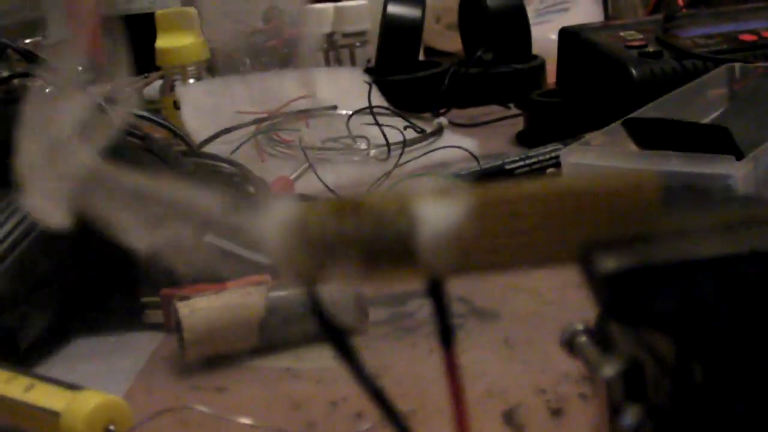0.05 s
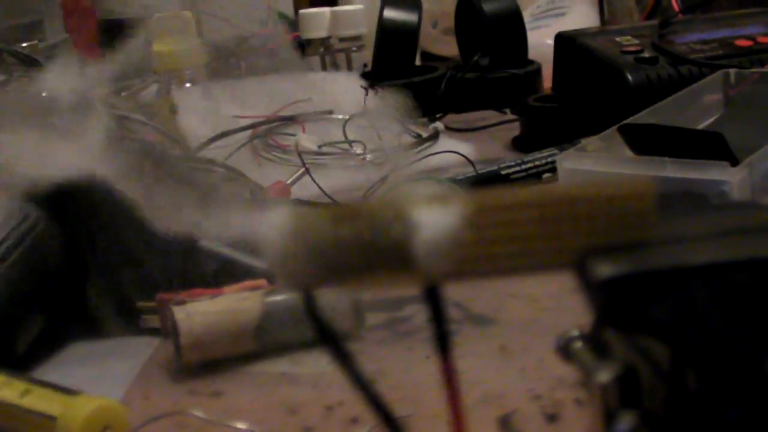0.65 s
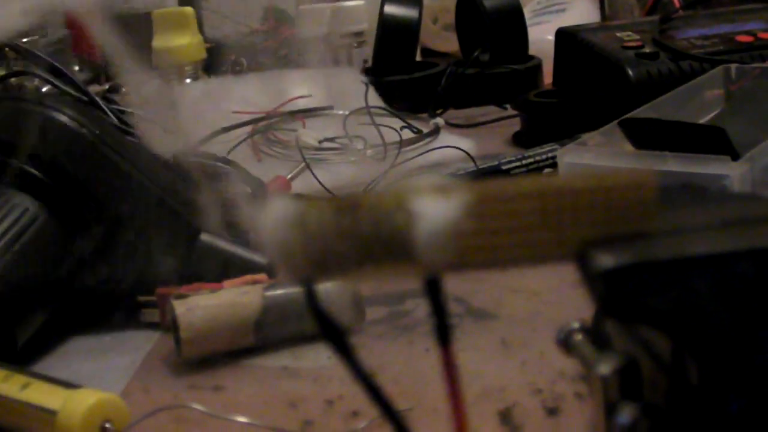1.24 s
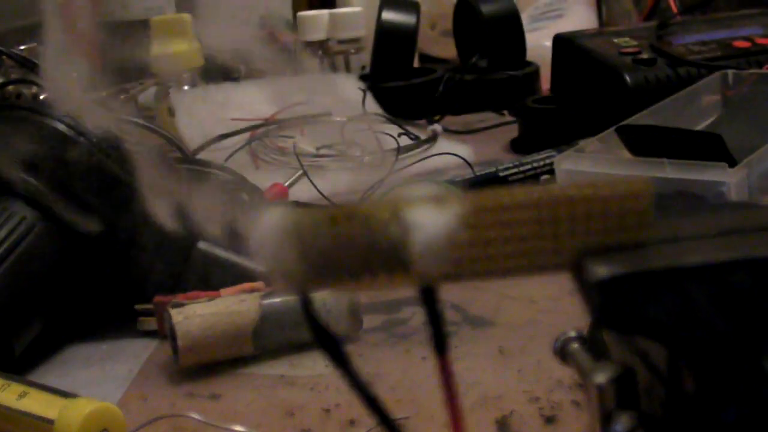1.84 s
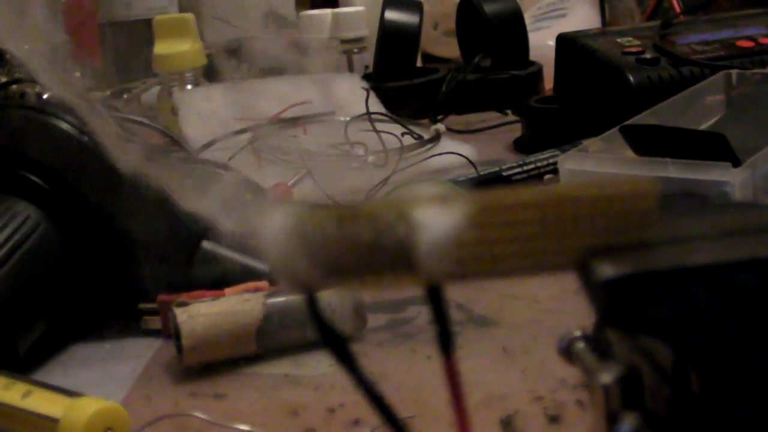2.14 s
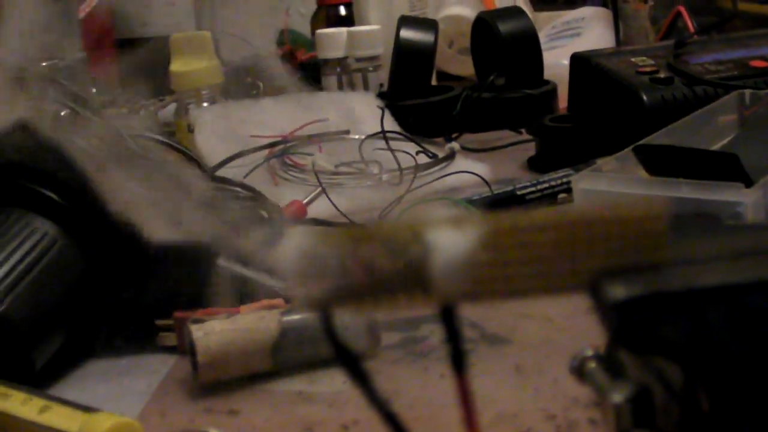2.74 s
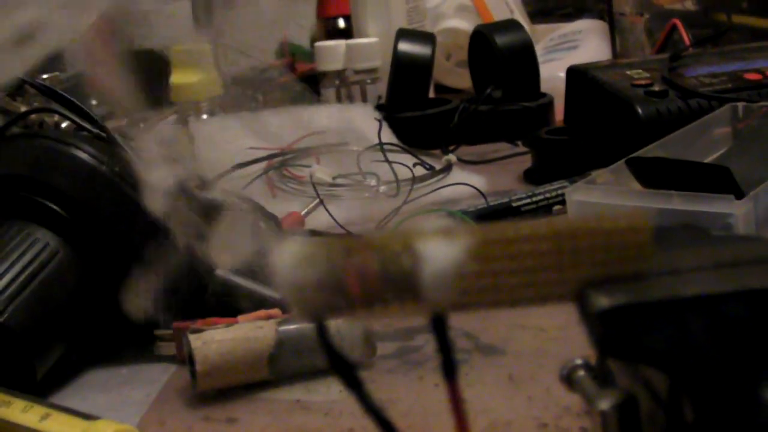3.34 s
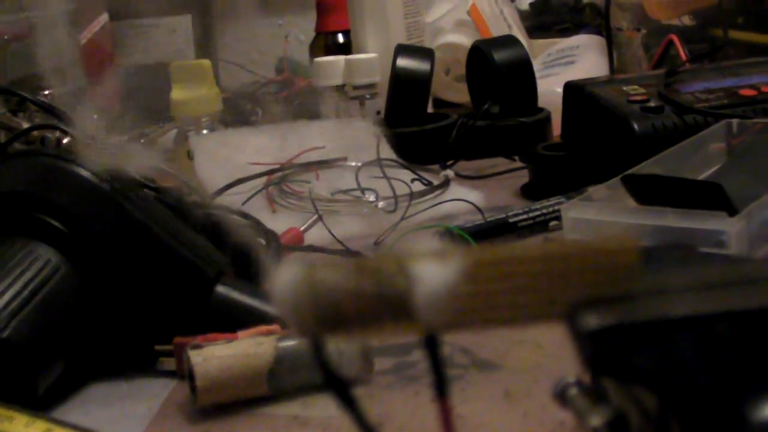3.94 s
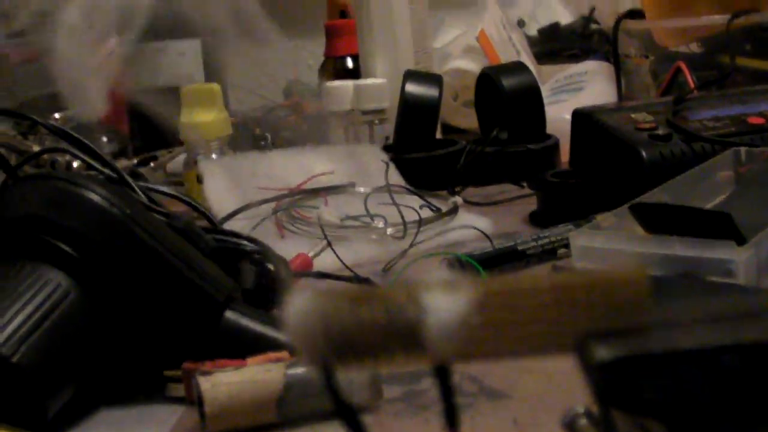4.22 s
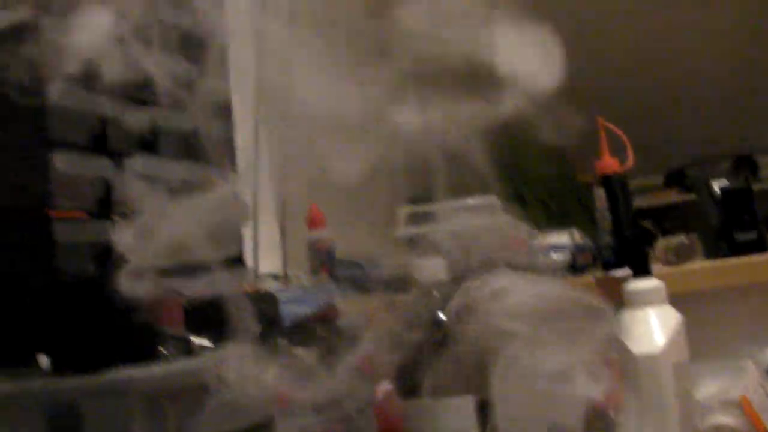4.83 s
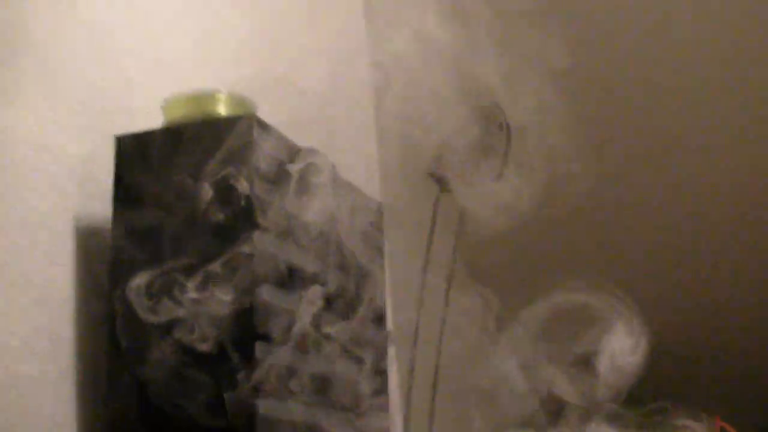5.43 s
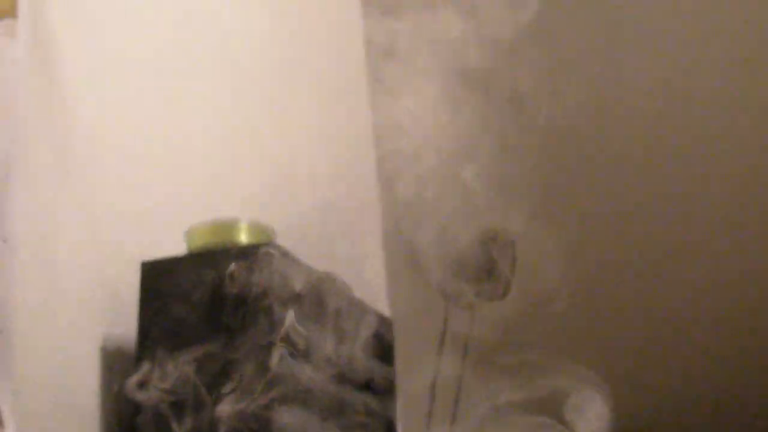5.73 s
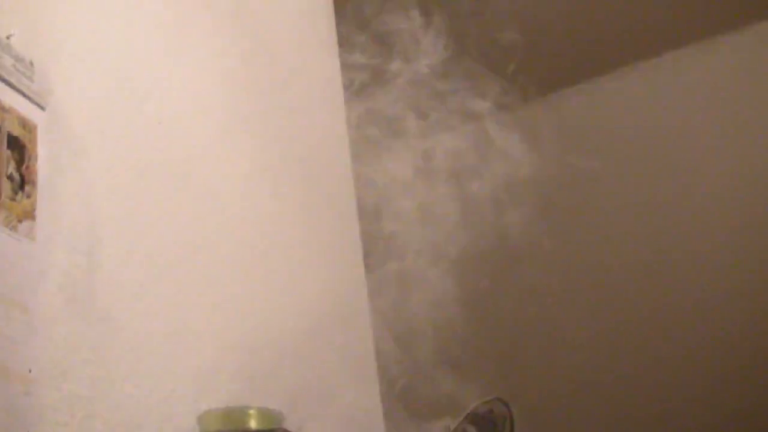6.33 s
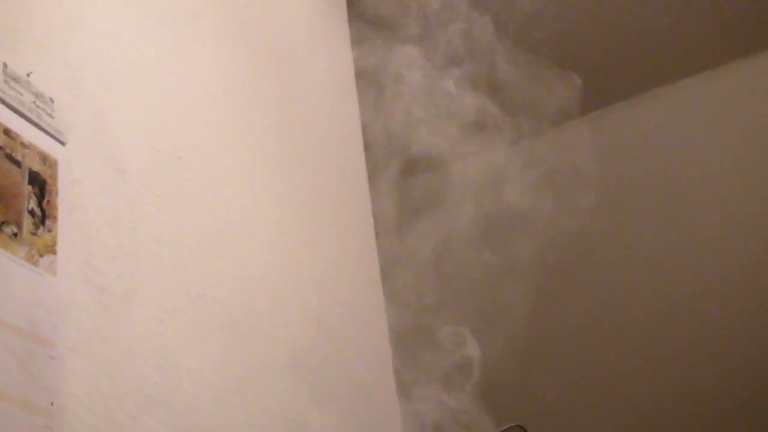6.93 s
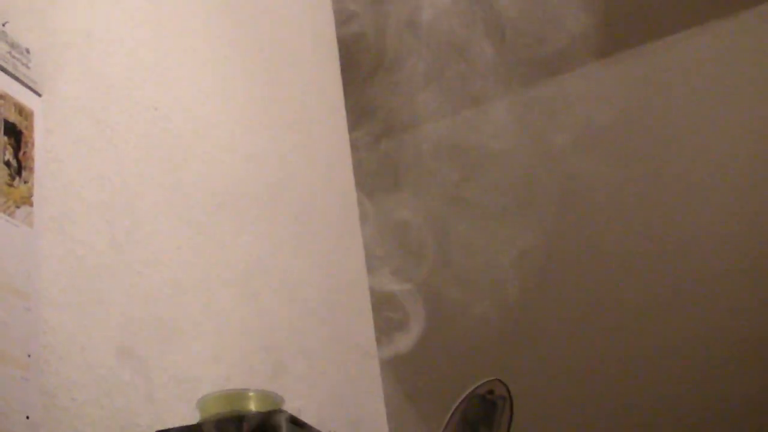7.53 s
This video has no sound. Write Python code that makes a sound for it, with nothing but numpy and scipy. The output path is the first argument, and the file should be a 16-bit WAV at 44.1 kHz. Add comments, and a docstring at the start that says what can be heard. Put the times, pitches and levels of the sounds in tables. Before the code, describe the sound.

A close, high sizzle with sharp little pops fades away after about four seconds, leaving a low hum and fan rush.

```python
"""A workshop bench: a homemade vaporizer boils liquid on its hot coil, close to a camcorder.
Thousands of tiny bursting bubbles sizzle and big ones pop; the boil dies away as the coil cools.
Under it the camcorder's drive buzzes at the field rate, beating slowly with a motor's hum.
A hand bumps the camera, and a fan fills the room."""
import sys
import numpy as np
from scipy import signal
from scipy.fft import rfft, irfft
from scipy.io import wavfile
from scipy.ndimage import uniform_filter1d

SR = 44100
rng = np.random.default_rng(int(sys.argv[2]) if len(sys.argv) > 2 else 0)


def int16_out(signal):
    """Quantize to a 16-bit WAV file."""
    q = np.round(np.clip(np.atleast_2d(signal).T, -1, 1) * 32767)
    wavfile.write(sys.argv[1], SR, q.astype(np.int16))


N = 333837
T = np.arange(N) / SR
BIN_HZ = np.maximum(np.arange(N // 2 + 1) * SR / N, 1)


# Boil strength from power-off, coil cooling: t/s, gain/dB
BOIL_DECAY = [(3.68, 1), (3.79, -3), (3.95, -6.5), (4.11, -8.3), (4.16, -11.6), (4.34, -12.2), (4.7, -17),
              (5.0, -24), (5.6, -25.5), (7.57, -31.5)]
# Slow surges under power: t/s, fizz gain/dB, spit gain/dB
BOIL_SURGES = [(0.0, -0.5, -3.5), (0.2, 1.1, 0.5), (0.42, -2, -2.2), (0.8, 0.4, 0), (1.08, -1.5, -1),
               (1.35, -1.4, -2), (1.5, 0.4, 1.4), (2.1, -0.6, 1.1), (2.55, -1, -0.4), (2.9, -1.3, -1.5),
               (3.35, -1.6, -1), (3.7, -0.3, 0.5)]
# Fine-bubble spectrum: f/Hz, gain/dB
FIZZ_SPECTRUM = [(500, -38), (2000, -19.5), (4000, -3.5), (4750, -4), (5600, -0.5), (7400, 2), (8600, 0.5),
                 (11000, 0), (12200, -2), (13500, 2), (15800, -4.5)]
# Coarse-bubble spectrum: f/Hz, gain/dB
SPIT_SPECTRUM = [(200, -5.5), (500, 0), (900, -1), (1600, -0.5), (2200, 1), (2500, -1), (2900, 0),
                 (3700, -0.5), (5000, -1.5), (9000, -14.5)]

def sizzle(fizz_base_db=-32, spit_base_db=-41):
    """Fine fizz, sparse dry crackles and coarser spitting surge, then fade as the coil cools."""
    times, fizz_db, spit_db = np.transpose(BOIL_SURGES)
    boil_db = np.interp(T, *np.transpose(BOIL_DECAY)) + 0.5 * wander(16)
    crackles = unit_rms(bubbles(per_s=200, spread_db=3.5, echo_db=-12))
    fizz = unit_rms(bubbles(per_s=14000, spread_db=3.5, echo_db=-0.5))
    fizz = unit_rms(colour(fizz + undb(-21) * crackles, FIZZ_SPECTRUM))
    fizz *= undb(fizz_base_db + np.interp(T, times, fizz_db))
    spit = bubbles(per_s=5000, spread_db=3, echo_db=-5.5)
    spit = unit_rms(colour(spit, SPIT_SPECTRUM))
    spit *= undb(spit_base_db + np.interp(T, times, spit_db) + 1.1 * wander(14))
    return (fizz + spit) * undb(boil_db)


def bubbles(per_s, spread_db, echo_db):
    """Tiny bursts at random times, most weak, a few strong, each with its echoes."""
    strength = undb(spread_db * np.minimum(rng.exponential(size=N), 7))
    bursts = (rng.random(N) < per_s / SR) * strength * rng.choice([-1, 1], N)
    return mic_pair(bursts) + undb(echo_db) * scatter(bursts, decay_s=0.015)


# Big bubbles, ending in a sputter: t/s, relative energy/dB, nominal f/Hz, spray re snap/dB
BIG_POPS = [(0.1321, 5.5, 6700, -6), (0.201, -13, 3600, -2), (0.2671, -14, 6500, -7),
            (0.3027, -5.5, 7300, -4.5), (0.384, -7, 5600, 2.5), (0.6337, -4.5, 11000, 1),
            (0.652, -23, 5000, 0), (0.7126, -12, 4200, -5), (0.7614, -2.5, 6400, -1), (0.822, -6, 4400, 1),
            (0.8344, 5, 4500, -15), (0.9019, -15, 4800, -7), (1.003, -13, 6000, -4), (1.255, -11, 7500, -7),
            (1.3008, -1.5, 5000, -13), (1.4041, -0.5, 8800, -5), (1.4701, -17, 7000, -3),
            (1.4822, -9.5, 5000, 7), (1.508, -16, 5000, -3), (1.6088, -12.5, 4000, -7),
            (1.678, -14.5, 3600, -4), (1.7122, -9, 5400, -2), (1.7802, -12, 6600, -5),
            (1.792, -11, 6000, -5), (1.833, -13, 5500, -3), (1.8434, -15, 6500, -6),
            (1.9206, -11, 5500, -4), (2.061, -14, 3400, -1), (2.0836, 3.5, 3200, -17),
            (2.1396, -17, 4000, -6), (2.3152, -11, 5600, 2), (2.441, -8.5, 7700, -3),
            (2.4537, -10.5, 5500, -4), (2.6954, -3.5, 9800, -6), (2.734, -15, 5500, -4),
            (2.7627, -8.5, 6500, 0), (2.9446, -2.5, 5400, -6), (3.0152, -16, 5500, -4),
            (3.0872, -22, 3400, -4), (3.2122, -6, 7600, -2), (3.231, -7, 6400, 0), (3.2907, -14, 7500, -6),
            (3.3903, -10, 6000, -6), (3.5903, -19, 5500, -6), (3.7337, -24, 5000, 19),
            (3.828, -18, 5000, -3), (3.87, -16.5, 6400, -6), (3.9203, -16, 6400, -6),
            (3.9448, -14, 7600, -4), (3.9692, -14, 6400, 0), (4.0051, -14, 6400, -8),
            (4.0256, -19, 6400, -5), (4.0535, -16, 5400, -2), (4.0755, -16, 6800, -5),
            (4.088, -22, 6400, -4), (4.0995, -16, 6400, -9), (4.113, -19, 6400, -3), (4.1318, -17, 6000, 2)]

def pops(edge_db=-9, body_db=-11, room_db=-11, spray_decay_s=0.0078, size=1024):
    """A bursting bubble: one sharp pressure cycle, a spray of droplets, a short, duller room tail."""
    rows = list(BIG_POPS) + small_pops(until_s=BOIL_DECAY[0][0])
    snaps, sprays = np.zeros(N + size), np.zeros((2, N + size))
    t = np.arange(size) / SR
    impulse = -1.0 * (t == 0)
    edge = undb(edge_db) * unit_rms(bandpass(impulse, 11000, 5000))
    body = undb(body_db) * unit_rms(bandpass(impulse, 900, 1900))
    for at_s, db, hz, spray_db in rows:
        snap = unit_rms(bandpass(impulse, 0.88 * hz, 1.23 * hz)) + edge + body
        droplets = bandpass(rng.standard_normal((2, size)), 1.34 * hz, 1.1 * hz)
        spray = unit_rms(droplets * np.exp(-t / spray_decay_s))
        start = int(at_s * SR)
        gain = undb(db + 0.04) / np.sqrt(size)
        snaps[start:start + size] += gain * snap
        sprays[:, start:start + size] += gain * undb(spray_db) * spray
    room = undb(room_db) * bandpass(scatter(snaps[:N], decay_s=0.0052), 1400, 7000)
    return mic_pair(snaps[:N]) + sprays[:, :N] + room


def small_pops(until_s, count=8, db=-11, hz=9000, spray_db=-17, spread_db=4, spread_oct=0.46):
    """Smaller bubbles burst at random under power; rows as in BIG_POPS."""
    times = until_s * (np.arange(count) + rng.random(count)) / count
    return [(at_s, db + spread_db * loud, hz * 2 ** (spread_oct * high), spray_db)
            for at_s, (loud, high) in zip(times, rng.standard_normal((count, 2)))]


# Wet bubbles: t/s, onset level/dB, onset f/Hz, decay/s
RINGING_BUBBLES = [(0.8344, -8, 4870, 0.00041), (3.679, -32, 2920, 0.0022), (3.7, -20.5, 2840, 0.00073),
                   (3.734, -16.5, 3560, 0.00067), (3.7345, -33, 2290, 0.0046)]

def gurgles(glide_per_s=25, size=1024):
    """A bubble in the liquid rings for a few cycles, rising in pitch as it surfaces."""
    rings = np.zeros(N + size)
    t = np.arange(size) / SR
    for at_s, db, hz, decay_s in RINGING_BUBBLES:
        start = int(at_s * SR)
        phase = 2 * np.pi * hz * t * (1 + glide_per_s * t / 2)
        rings[start:start + size] += undb(db) * np.sin(phase) * np.exp(-t / decay_s)
    return mic_pair(rings[:N])


# Holder modes: f/Hz, width/Hz, level re direct/dB
HOLDER_MODES = [(1260, 41, -3.5), (2022, 49, -1.5), (2290, 200, -7.5), (2800, 310, -6.5), (3106, 450, -5.5),
                (3700, 85, -11), (3990, 75, -17), (5250, 200, -13), (6010, 200, -10.5), (6400, 300, -23)]
# Bench-echo notches: f/Hz, width/Hz, share removed/0-1
BENCH_NOTCHES = [(1810, 80, 0), (2500, 66, 0), (3560, 130, 0.1), (4560, 450, 0.14), (7200, 170, 0.25)]

def holder_and_bench(boil):
    """The coil's holder rings faintly; bench echoes partly cancel a few pitches."""
    boil = boil + sum(undb(db) * bandpass(boil, hz, width_hz) for hz, width_hz, db in HOLDER_MODES)
    for hz, width_hz, share in BENCH_NOTCHES:
        boil = boil - share * bandpass(boil, hz, width_hz)
    return boil


# Spectrum of one drive knock: f/Hz, gain/dB
KNOCK_SPECTRUM = [(30, -28), (60, -12.5), (120, -0.5), (180, 0), (240, 0), (300, 0.7), (360, 2.04),
                  (420, -3.5), (540, -13), (700, -30.5), (960, -15.5), (1200, -21.5), (1600, -25),
                  (3000, -46.5)]

def camcorder(field_hz=59.94, line_hz=15734, pulse_hz=11.4, uneven_db=0.97):
    """The drive knocks once a field, rattling the case; the line circuit gives a pulsing whistle."""
    times = np.arange(0.00195, N / SR - 0.001, 1 / field_hz)
    knocks = np.zeros(N)
    knocks[(times * SR).astype(int)] = -undb(uneven_db * rng.standard_normal(len(times)))
    rattle = undb(-15) * scatter(knocks, decay_s=0.0045)
    buzz = undb(-41) * unit_rms(colour(knocks + rattle, KNOCK_SPECTRUM))
    chatter = bandpass(scatter(knocks, decay_s=0.011), 1080, 600)
    chatter = undb(-67) * unit_rms(chatter * undb(5.5 * wander(25)))
    pulsing = 1 + 0.38 * np.sin(2 * np.pi * pulse_hz * T)
    whistle = undb(-66) * unit_rms(pulsing * np.sin(2 * np.pi * line_hz * T))
    whine = undb(-72.5) * unit_rms(bandpass(rng.standard_normal((2, N)), 9625, 70))
    return buzz + chatter + whistle + whine


# Hand on the camera: peak t/s, level/dB, f/Hz, width/Hz, Gaussian sigma/s
HAND_BUMPS = [(4.84, -48.5, 850, 1500, .025), (4.93, -50, 130, 80, .04), (5.908, -41, 92, 40, .025),
              (5.895, -43, 310, 300, .04)]

def handling():
    """Dull bumps and scuffs through the camera body as it tilts up."""
    bumps = np.zeros(N)
    for at_s, db, hz, width_hz, sigma_s in HAND_BUMPS:
        band = bandpass(rng.standard_normal(N), hz, width_hz)
        thud = unit_rms(bandpass(band, hz, width_hz))
        bumps += undb(db) * thud * np.exp(-((T - at_s) / sigma_s) ** 2 / 2)
    return bumps


# Motor hum, louder once the camera is raised: t/s, f/Hz, level/dB
MOTOR_HUM = [(0, 121.15, -67), (0.68, 120.535, -53.5), (3.0, 120.535, -52), (4.4, 120.52, -56),
             (5.3, 120.535, -56), (6.35, 121.08, -56), (6.68, 120.33, -46), (7.57, 120.08, -46)]

def motor():
    """A motor in the room hums just above the drive's second harmonic; the two beat slowly."""
    times, hz, db = np.transpose(MOTOR_HUM)
    phase = 2 * np.pi * np.cumsum(np.interp(T, times, hz)) / SR
    return -unit_rms(np.sin(phase)) * undb(np.interp(T, times, db))


# Fan rush and microphone hiss: f/Hz, relative density/dB
AIR_SPECTRUM = [(20, -34), (45, -20), (80, -10.5), (140, -2.5), (210, -6.5), (330, -3), (450, -11),
                (650, -15.5), (1100, -19.5), (1400, -23.5), (2000, -22.3), (3000, -24.5), (7000, -27.5),
                (11500, -39), (14200, -35), (15500, -41)]
# Left-right likeness of the rush: f/Hz, coherence/-1..1
AIR_COHERENCE = [(60, 0.23), (130, 0.57), (300, 0.69), (640, 0.45), (1400, 0.54), (3100, 0.33),
                 (7000, -0.26), (15000, -0.44)]
# Rush, rising as the camera lifts off the bench: t/s, level/dB
AIR_LEVEL = [(0, -46.5), (3.8, -46.5), (4.9, -44.3), (7.57, -44.5)]

def fan(blade_hz=238.84, blade_db=-60.5):
    """Rushing air, plus a blade tone beating near 1 Hz with the drive's fourth harmonic."""
    blades = undb(blade_db) * unit_rms(np.sin(2 * np.pi * blade_hz * T))
    spectrum = undb(log_interp(AIR_SPECTRUM, BIN_HZ))
    coherence = log_interp(AIR_COHERENCE, BIN_HZ)
    mid = irfft(rfft(rng.standard_normal(N)) * spectrum * np.sqrt(1 + coherence), N)
    side = irfft(rfft(rng.standard_normal(N)) * spectrum * np.sqrt(1 - coherence), N)
    rush = unit_rms(np.array([mid + side, mid - side]))
    rush_db = np.interp(T, *np.transpose(AIR_LEVEL)) + 0.069 * wander(3.1)
    return blades + undb(rush_db) * rush


def mic_pair(x, lag_s=2.4e-5):
    """The coil is off-centre: its sound reaches the right microphone first."""
    left = irfft(rfft(x) * np.exp(-2j * np.pi * BIN_HZ * lag_s), N)
    return np.array([left, x])


def scatter(x, decay_s):
    """Diffuse echoes off clutter: a fading noise tail per burst, independent left and right."""
    pole = np.exp(-1 / (decay_s * SR))
    energy = signal.lfilter([1 - pole], [1, -pole], x ** 2 + 1e-18)
    return np.sqrt(energy) * rng.standard_normal((2, N))


def colour(x, points, size=4096):
    """Minimum-phase filter from (f/Hz, gain/dB) points."""
    hz = np.maximum(np.arange(size // 2 + 1) * SR / size, 1)
    cepstrum = irfft(np.log(undb(log_interp(points, hz))))
    cepstrum[1:size // 2] *= 2
    cepstrum[size // 2 + 1:] = 0
    response = irfft(np.exp(rfft(cepstrum)))
    return signal.fftconvolve(np.atleast_2d(x), response[None], axes=1)[:, :N]


def bandpass(x, hz, width_hz):
    """Two-pole resonance, unity gain at centre."""
    q = hz / min(width_hz, 0.4 * SR)
    return signal.lfilter(*signal.iirpeak(min(hz, 0.45 * SR), q, fs=SR), x)


def wander(rate_hz):
    """Smooth random drift, rms 1."""
    hold = int(SR / rate_hz)
    steps = np.repeat(rng.standard_normal(N // hold + 1), hold)
    return unit_rms(uniform_filter1d(uniform_filter1d(steps, hold), hold)[:N])


def log_interp(points, hz):
    """Read (f/Hz, value) points on a log-frequency axis."""
    point_hz, values = np.transpose(points)
    return np.interp(np.log(hz), np.log(point_hz), values)


def undb(db):
    return 10 ** (np.asarray(db) / 20)


def unit_rms(x):
    return x / np.sqrt(np.mean(x ** 2))


def scene(right_bias_db=0.5):
    """The coil slightly to the right, over camera noises and the room."""
    balance = undb([[-right_bias_db / 2], [right_bias_db / 2]])
    coil = balance * holder_and_bench(sizzle() + pops() + gurgles())
    return coil + camcorder() + motor() + fan() + handling()


def record(dry, cutoff_hz=15900):
    """Microphone housing: a narrow peak beside a notch. Then a full-scale limit and a steep low-pass."""
    peaked = dry + bandpass(dry, 7640, 120)
    notched = peaked - bandpass(peaked, 7940, 240)
    lowpass = signal.ellip(10, 0.2, 70, cutoff_hz, fs=SR, output="sos")
    return signal.sosfilt(lowpass, np.clip(notched, -1, 1))


dry = scene()
out = record(dry)
int16_out(out)
```